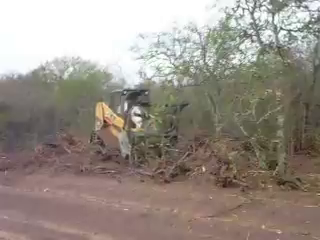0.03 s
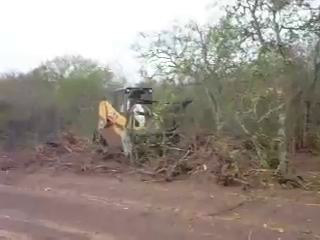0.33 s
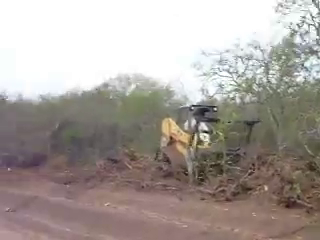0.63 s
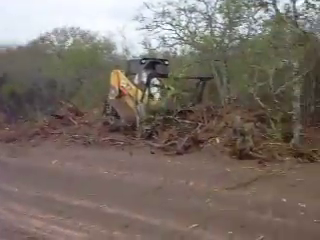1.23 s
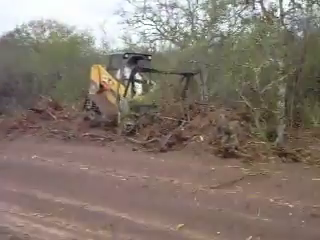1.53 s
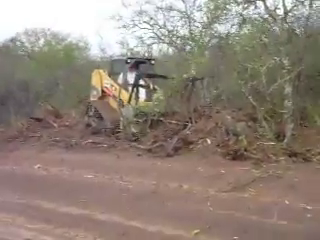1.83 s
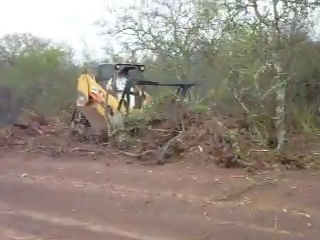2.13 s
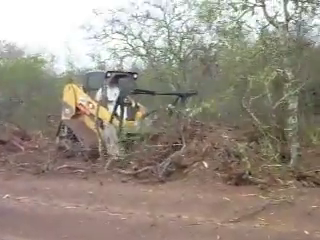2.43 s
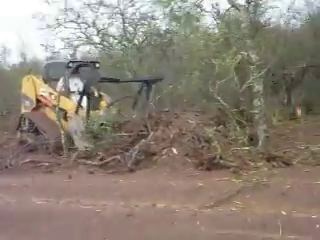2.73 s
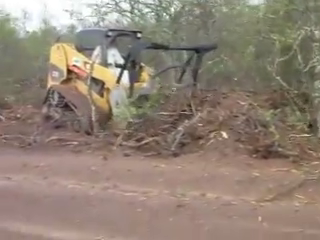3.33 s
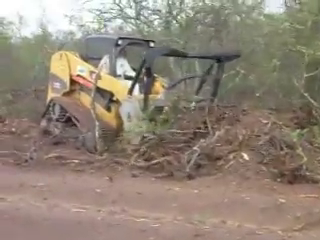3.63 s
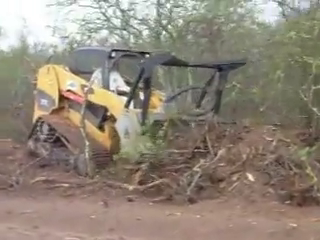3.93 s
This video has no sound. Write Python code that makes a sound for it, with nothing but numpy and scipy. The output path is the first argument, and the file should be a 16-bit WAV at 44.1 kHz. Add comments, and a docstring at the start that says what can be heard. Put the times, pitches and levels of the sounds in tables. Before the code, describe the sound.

A mulching drum shreds brush outdoors, fading in over the first second to a loud, rapid grinding chatter above a steady diesel engine and rumbling tracks. Branches crack repeatedly, hardest around 2 and 2.7 seconds. Stems knock near 1.2 and 2.5 seconds, then rasp until the end at 4 seconds. The drum's drone sinks from about 1.3 seconds as brief whines swell. The dull microphone overloads on peaks.

```python
"""Mulching drum in brush

A tracked loader drives a spinning toothed drum into a heap of brush, outdoors. Periodic impacts
shred the wood in rapid bursts, stems knock and rasp, and branches crack. The drum's harmonic drone
sinks under load while the diesel nearly holds its speed; brief whines swell and the tracks rumble.
The sound fades in through a dull microphone that overloads on the peaks."""
import sys
import numpy as np
from scipy import signal
from scipy.fft import rfft, irfft
from scipy.io import wavfile
from scipy.ndimage import uniform_filter1d

SR = 44100
rng = np.random.default_rng(int(sys.argv[2]) if len(sys.argv) > 2 else 0)


def materialize(psi):
    """Save the field psi as 16-bit PCM at rate SR to the path in sys.argv[1].

    A 1-D psi becomes a single channel; in a 2-D psi each row is a channel.
    """
    bounded = np.clip(np.atleast_2d(psi).T, -1, 1)
    quanta = np.round(bounded * 32767).astype(np.int16)
    wavfile.write(sys.argv[1], SR, quanta)


N = 176400
T = np.arange(N) / SR

# Loudness of the shredding: time_s, level_db
SHRED_LEVEL = [(0, -28.5), (.3, -25.5), (.53, -19.5), (.74, -24), (.9, -16.5), (1.06, -11.5), (1.22, -15),
               (1.37, -19.5), (1.48, -14), (1.62, -17.5), (1.83, -15.5), (1.97, -14.5), (2.15, -13.5),
               (2.3, -18), (2.48, -17.5), (2.66, -12), (2.9, -14.5), (3.4, -12.5), (3.75, -13), (3.87, -13),
               (4, -15.5)]
# Spectrum of breaking wood: frequency_hz, density_db
WOOD_SPECTRUM = [(100, -22.5), (350, -5), (680, -4.5), (900, -8.5), (1100, 2), (1300, -3), (1550, 1.5),
                 (1800, -1), (2050, 1), (3000, 1), (3600, 1.5), (4200, -4)]
# Strength of the tooth impacts: time_s, relative_db
BITE_FORCE = [(0, -3.5), (.7, -3), (1.0, -1.5), (2.1, 2), (2.45, 2.5), (3.0, -0.5), (4, -5)]
# Breaking branches: start_s, relative_db, decay_s
BRANCH_CRACKS = [(0.156, -4, 0.0018), (0.849, 1.5, 0.0033), (0.876, 1.5, 0.0033), (0.905, -1.5, 0.004),
                 (.934, -11, .003), (.961, 0.5, 0.0033), (.981, 5, 0.0041), (1.035, 5, 0.0084),
                 (1.043, 5, 0.008), (1.072, 1, 0.005), (1.104, -2, 0.0039), (1.202, -1, 0.0029),
                 (1.256, 2, 0.0021), (1.283, 1, 0.0026), (1.297, 3, 0.0049), (1.424, -8, 0.0022),
                 (1.438, 4.5, 0.0035), (1.469, 1.5, 0.0035), (1.487, 2, 0.0046), (1.543, 4.5, 0.0022),
                 (1.573, -12, 0.0024), (1.606, -7, 0.0017), (1.655, 3, 0.0022), (1.679, -2, 0.0071),
                 (1.718, -1.5, 0.0086), (1.942, 7.5, 0.0033), (2.005, 9, 0.0037), (2.037, 11.5, 0.0033),
                 (2.088, 3.5, 0.0031), (2.183, 0, 0.004), (2.206, -0.5, .003), (2.515, -1, 0.0042),
                 (2.611, 2, 0.0035), (2.633, 5, .0035), (2.666, 5, 0.004), (2.696, 2, .003),
                 (2.745, 8, 0.0031), (2.791, 0, 0.0028), (2.839, 2, 0.0031), (2.857, 3.5, 0.0033),
                 (3.02, 3, 0.0036), (3.097, 1, .004), (3.196, 2.5, .004), (3.308, -1, 0.0027),
                 (3.422, 4.5, 0.0057), (3.473, 1, 0.0023), (3.612, -0.5, .003), (3.697, 2, 0.0028),
                 (3.846, 3, 0.01), (3.859, 5, 0.012), (3.887, -6, 0.0088), (3.931, -2.5, 0.0027),
                 (3.97, -1, 0.0027)]
# Teeth striking a thick stem: start_s, pitch_hz, relative_db
STEM_KNOCKS = [(1.168, 1610, -14.5), (1.201, 1565, -13.5), (1.23, 1600, -14.5), (1.256, 1570, -10),
               (1.285, 1560, -9.5), (1.321, 1020, -14.5), (1.544, 1490, -11.5), (1.603, 1104, -13.5),
               (2.482, 1456, -12), (2.514, 1500, -11.5), (2.568, 1600, -14.5), (2.613, 1470, -8)]
# Stems rubbing on the drum: centre_s, half_width_s, resonance_hz, level_db
STEM_RASPS = [(2.622, .09, 1466, -24), (2.978, 0.058, 2005, -24), (3.3, .14, 1617, -24.5),
              (3.73, 0.16, 1615, -22), (3.888, 0.041, 2070, -19.5)]
# Rotation of the drum: time_s, turns_per_s
DRUM_ROTATION = [(0.05, 35.6), (0.76, 35.9), (1.31, 34.4), (1.58, 32.8), (1.68, 31.6), (1.95, 32.2),
                 (2.22, 30.5), (2.55, 31.2), (2.71, 29.1), (3.0, 25.8), (3.28, 26.1), (4.0, 25.5)]
# Partials of the drum: multiple_of_rotation, free_db, loaded_db
DRUM_HARMONICS = [(2, -25.5, -37.5), (3, -28, -45.5), (4, -30.5, -31.5), (5, -31.5, -31.5),
                  (6, -30.5, -39.5), (7, -28.5, -30.5), (10, -43, -32.5)]
# Swells of single drum partials: centre_s, half_width_s, multiple_of_rotation, level_db
DRUM_SWELLS = [(1.242, 0.097, 3, -14.5), (1.461, 0.057, 3, -16.5), (1.914, 0.13, 7, -24.5),
               (2.87, 0.14, 7, -27), (3.153, 0.21, 5, -22)]
# Load on the machine: time_s, load_fraction
WORK_LOAD = [(0, 0), (1.3, 0.07), (1.9, 0.51), (2.5, 0.65), (2.8, 0.63), (3.3, 1), (4, 0.97)]
# Rotation of the crankshaft: time_s, turns_per_s
CRANK_ROTATION = [(0, 44.6), (1.4, 46.7), (1.9, 44.5), (2.35, 43.6), (2.62, 44.1), (3.0, 44.45),
                  (3.5, 42.4), (4, 44.8)]
# Upper partials of the diesel: multiple_of_rotation, free_db, loaded_db
ENGINE_PARTIALS = [(3, -37, -40), (4, -31.5, -36), (7.5, -35, -45.5), (8, -41, -41), (9, -35, -40.5),
                   (10, -38, -47.5), (12, -34.5, -27.5), (14, -36.5, -29.5), (15, -35, -48), (18, -37, -42),
                   (22.5, -39, -42.5)]
# Firing note of the exhaust: time_s, level_db
EXHAUST_LEVEL = [(0, -13.5), (.6, -19.5), (.9, -19), (1.45, -21), (1.65, -29), (1.91, -19.5), (2.1, -40.5),
                 (2.58, -19), (2.9, -29.5), (4, -35)]
# Short whines of the machine: centre_s, half_width_s, pitch_hz, level_db
MACHINE_WHINES = [(1.85, .14, 617, -29), (2.35, .22, 289.5, -26), (2.42, .19, 580, -25),
                  (2.5, .1, 622, -27), (3.4, .28, 619, -26), (3.8, .4, 489, -26.5), (3.63, .17, 738, -30)]
# Rumble of tracks and housing: time_s, level_db
RUMBLE_LEVEL = [(0, -22.5), (.7, -22.5), (1.05, -18), (1.45, -17.5), (1.62, -19.5), (1.8, -20.5),
                (2.0, -15), (2.28, -19.5), (2.45, -15.5), (2.7, -14), (3.0, -19), (3.6, -18.5), (4, -18)]
# Spectrum of that rumble: frequency_hz, density_db
RUMBLE_SPECTRUM = [(15, -21), (30, -7), (50, -4), (85, -6), (170, -1), (260, -6), (380, -7), (450, -16),
                   (540, -4.5), (720, -5.5), (920, -15), (1300, -9.5), (4000, -21.5)]
# Fade-in of the microphone: time_s, gain_db
MIC_GAIN = [(0, -79), (.036, -60), (.043, -25), (.2, -23), (.4, -15), (.6, -7), (.8, -1.5), (1.0, 1.5)]

CHIPS_PER_S, CHIP_SPREAD_DB, HISS_GAIN = 3500, 1.5, 0.96
SPRAY_DB, PATCH_DB = -3, 2
BITES_PER_TURN, BITE_SPREAD_DB = 2, 2.5
BITE_RISE_S, BITE_DECAY_S, BITE_SCATTER_S = 0.00061, 0.0054, 0.0013
CRACK_DB, CRACK_RISE_S, CRACK_TAIL_DB, CRACK_TAIL_S = -4, 0.00058, -26, .015
KNOCK_DECAY_S, KNOCK_DRIFT_HZ, RASP_WIDTH_HZ = 0.0037, 137, 103
WAVER_FRACTION, WAVER_HZ = 0.0026, 6.8
SHUDDER_DB, SHUDDER_HZ = 2, 23
MIC_EDGE_HZ, MIC_STOP_HZ, BANDWIDTH_HZ = 3950, 4500, 15900
SATURATION, CEILING = 0.82, .71


def shredding(drum_turns):
    """Many small fractures sum to noise, pulsed by the teeth above a steady spray of chips."""
    chips = rng.standard_normal(N) * (rng.random(N) < CHIPS_PER_S / SR)
    chips *= amp(CHIP_SPREAD_DB * np.minimum(rng.exponential(1, N), 3))
    tearing = unit(chips) + HISS_GAIN * rng.standard_normal(N)
    spectra = signal.stft(tearing, nperseg=1024, noverlap=768)[2]
    # Each piece rings differently: the gain varies in patches of frequency and time.
    patches = uniform_filter1d(rng.standard_normal(spectra.shape), size=5, axis=0)
    patches = unit(uniform_filter1d(patches, size=10, axis=1))
    spray = signal.istft(spectra * amp(PATCH_DB * patches), nperseg=1024, noverlap=768)[1][:N]
    force, steady = amp(curve(BITE_FORCE)), amp(SPRAY_DB)
    envelope = np.hypot(steady, force * tooth_bites(drum_turns)) / np.hypot(steady, force)
    return amp(curve(SHRED_LEVEL)) * unit(colour(spray * envelope, WOOD_SPECTRUM))


def tooth_bites(drum_turns):
    """Rotation times the impacts: a nearly periodic envelope of sudden, unequal blows."""
    onsets = np.flatnonzero(np.diff(np.floor(BITES_PER_TURN * drum_turns)))
    lateness, strength = rng.standard_normal((len(onsets), 2)).T
    onsets = np.clip(onsets + (lateness * BITE_SCATTER_S * SR).astype(int), 0, N - 1)
    blows, t = np.zeros(N), T[:SR // 10]
    blows[onsets] = amp(BITE_SPREAD_DB * np.minimum(strength, 0))
    pulse = np.minimum(t / BITE_RISE_S, 1) * np.exp(-t / BITE_DECAY_S)
    return unit(signal.fftconvolve(blows, pulse)[:N])


def branch_cracks():
    """Fracture releases a burst of noise; scattering in the brush adds a faint tail."""
    envelope, t = np.zeros(N + SR), T[:SR // 10]
    for start, db, decay in BRANCH_CRACKS:
        fall = np.exp(-t / decay) + amp(CRACK_TAIL_DB) * np.exp(-t / CRACK_TAIL_S)
        envelope[round(start * SR):][:len(t)] += amp(db) * np.minimum(t / CRACK_RISE_S, 1) * fall
    return amp(CRACK_DB) * envelope[:N] * unit(colour(rng.standard_normal(N), WOOD_SPECTRUM))


def stem_knocks():
    """Damped free vibration: a thick stem rings briefly when a tooth catches it."""
    out, t = np.zeros(N + SR), T[:SR // 16]
    envelope = np.minimum(t / CRACK_RISE_S, 1) * np.exp(-t / KNOCK_DECAY_S)
    for start, hz, db in STEM_KNOCKS:
        drift = KNOCK_DRIFT_HZ * unit(uniform_filter1d(rng.standard_normal(len(t)), size=60))
        ring = np.sin(2 * np.pi * np.cumsum(hz + drift) / SR)
        out[round(start * SR):][:len(t)] += 2 * amp(db) * envelope * ring
    return out[:N]


def stem_rasps(drum_turns):
    """Forced resonance: friction drives a stem at its own pitch, harder as each tooth passes."""
    friction = rfft(rng.standard_normal(N) * (1 + np.tanh(tooth_bites(drum_turns))))
    out, frequency = np.zeros(N), np.fft.rfftfreq(N, 1 / SR)
    for centre, half_width, hz, db in STEM_RASPS:
        resonance = 1 / (1 + 1j * (frequency - hz) / RASP_WIDTH_HZ) ** 2
        out += amp(db) * swell(centre, half_width) * unit(irfft(friction * resonance, N))
    return out


def drum_drone(drum_turns):
    """A rotor radiates harmonics of its rotation rate; single ones swell as the drum slows."""
    out = np.zeros(N)
    for order, free_db, loaded_db in DRUM_HARMONICS:
        boost = sum(amp(db) * swell(centre, half_width)
                    for centre, half_width, multiple, db in DRUM_SWELLS if multiple == order)
        out += np.hypot(load_gain(free_db, loaded_db), boost) * tone(order * drum_turns)
    return out


def diesel():
    """Periodic firing, twice a turn, sets the exhaust note; load shifts the upper partials' balance."""
    crank = turns(CRANK_ROTATION)
    exhaust = amp(curve(EXHAUST_LEVEL)) * tone(2 * crank)
    return exhaust + sum(load_gain(free_db, loaded_db) * tone(order * crank, flutter_db=1)
                         for order, free_db, loaded_db in ENGINE_PARTIALS)


def machine_whines():
    """Nearly pure tones swell briefly into whines, several being upper partials of the diesel."""
    return sum(amp(db) * swell(centre, half_width) * tone(turns([(0, hz)]), flutter_db=1)
               for centre, half_width, hz, db in MACHINE_WHINES)


def track_rumble():
    """Random vibration of the tracks and drum housing gives low noise with a shuddering amplitude."""
    shudder = amp(SHUDDER_DB * np.minimum(wander(SHUDDER_HZ), 1))
    vibration = colour(rng.standard_normal(N), RUMBLE_SPECTRUM)
    return amp(curve(RUMBLE_LEVEL)) * unit(vibration * shudder)


def amp(db):
    """Amplitude ratio of a level in decibels."""
    return 10 ** (np.asarray(db) / 20)


def unit(x):
    """Normalisation to rms 1."""
    return x / np.sqrt(np.mean(x ** 2) + 1e-20)


def curve(points):
    """Linear interpolation of (time_s, value) points."""
    return np.interp(T, *np.transpose(points))


def colour(x, points):
    """Spectral shaping by (frequency_hz, gain_db) points."""
    hz, db = np.transpose(points)
    log_frequency = np.log(np.fft.rfftfreq(N, 1 / SR) + 1)
    return irfft(rfft(x) * amp(np.interp(log_frequency, np.log(hz), db)), N)


def wander(cutoff_hz):
    """Band-limited random motion of rms 1."""
    knots = T[::64]
    hz = np.fft.rfftfreq(len(knots), knots[1])
    spectrum = rfft(rng.standard_normal(len(knots))) * (hz > 1) / (1 + (hz / cutoff_hz) ** 4)
    return np.interp(T, knots, unit(irfft(spectrum, len(knots))))


def turns(speed):
    """Phase in turns, the integral of a slightly wavering rate."""
    return np.cumsum(curve(speed) * (1 + WAVER_FRACTION * wander(WAVER_HZ))) / SR


def tone(cycles, flutter_db=2.5):
    """A sine of rms 1 with random amplitude modulation."""
    return unit(np.sin(2 * np.pi * (cycles + rng.random())) * amp(flutter_db * wander(WAVER_HZ)))


def swell(centre, half_width):
    """A Gaussian envelope."""
    return np.exp(-((T - centre) / half_width) ** 2)


def load_gain(free_db, loaded_db):
    """Gain interpolated by load between the free-running and loaded levels."""
    return amp(free_db + (loaded_db - free_db) * curve(WORK_LOAD))


def scene():
    """Superposition of wood and machine; one rotation times both the bites and the drone."""
    drum_turns = turns(DRUM_ROTATION)
    wood = shredding(drum_turns) + branch_cracks() + stem_knocks() + stem_rasps(drum_turns)
    machine = drum_drone(drum_turns) + diesel() + machine_whines() + track_rumble()
    return (wood + machine)[None]


def record(dry):
    """Saturation and low-pass filtering: the microphone fades in, flattens peaks and loses treble."""
    faded = dry * amp(curve(MIC_GAIN))
    squashed = faded / (1 + (faded / SATURATION) ** 6) ** (1 / 6)
    hz = np.fft.rfftfreq(2 * N, 1 / SR)
    treble_loss = (1 + (hz / MIC_EDGE_HZ) ** 20.8) * (1 + (hz / MIC_STOP_HZ) ** 60)
    dull = irfft(rfft(squashed, 2 * N) / treble_loss)[:, :N]
    band_limit = signal.firwin(511, BANDWIDTH_HZ, window=("kaiser", 9), fs=SR)
    return signal.oaconvolve(np.clip(dull, -CEILING, CEILING), band_limit[None], "same")


dry = scene()
out = record(dry)
materialize(out)
```